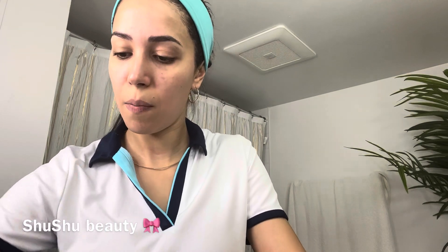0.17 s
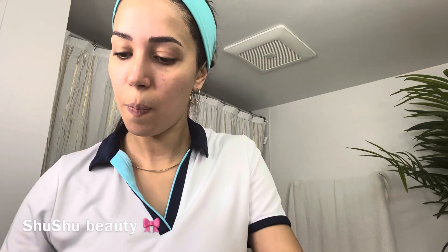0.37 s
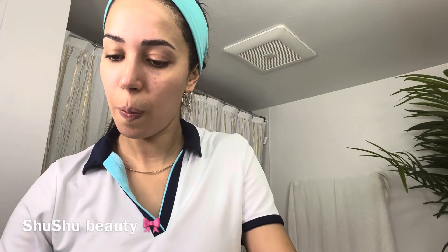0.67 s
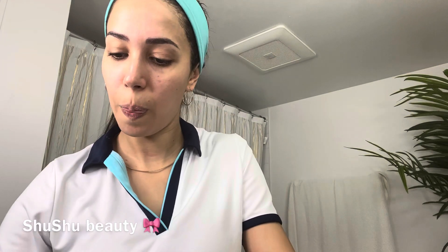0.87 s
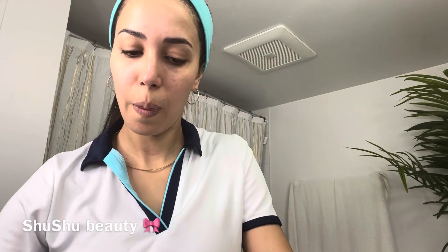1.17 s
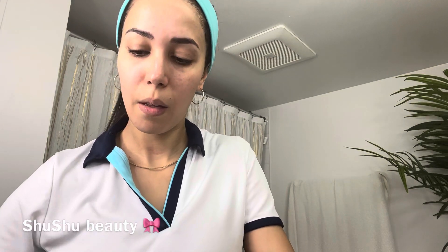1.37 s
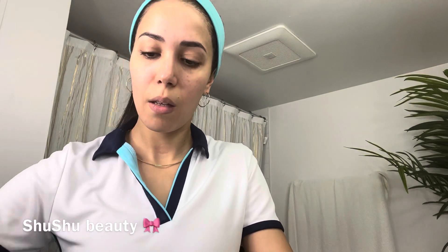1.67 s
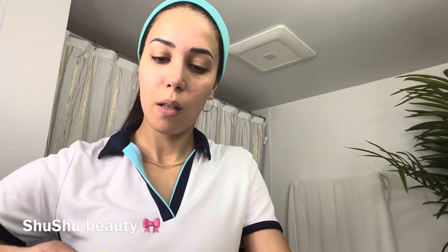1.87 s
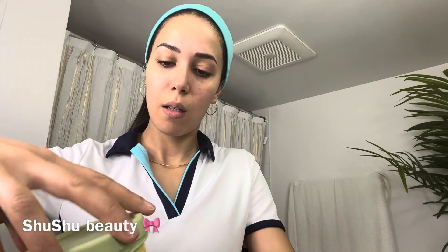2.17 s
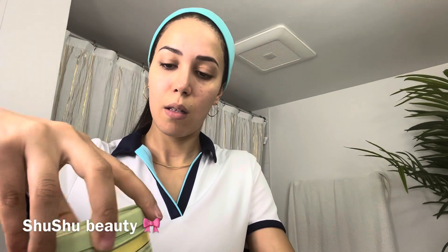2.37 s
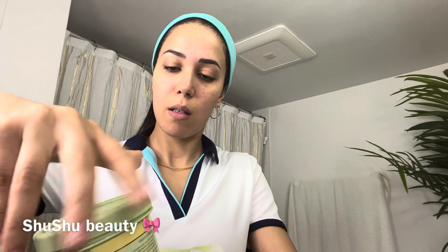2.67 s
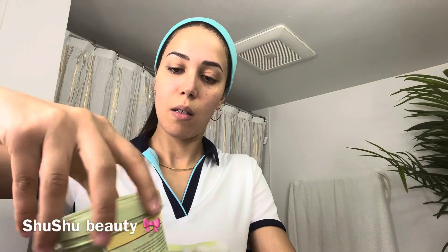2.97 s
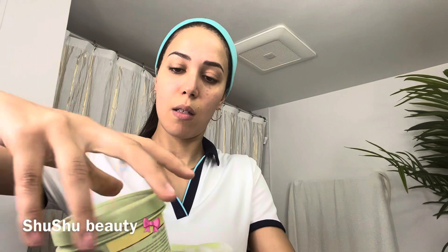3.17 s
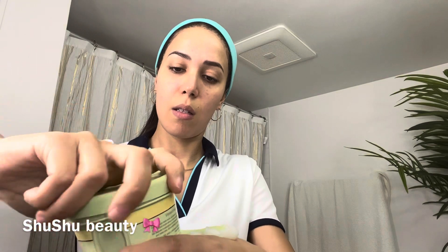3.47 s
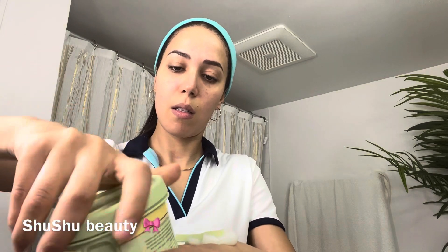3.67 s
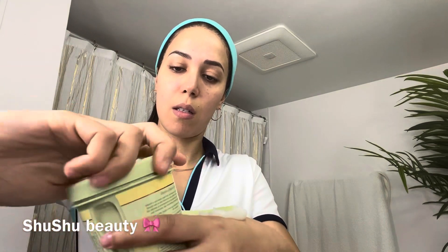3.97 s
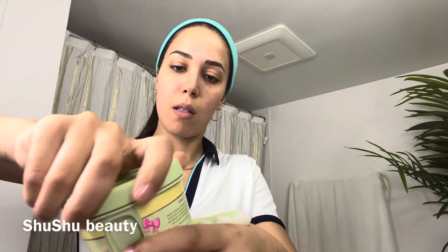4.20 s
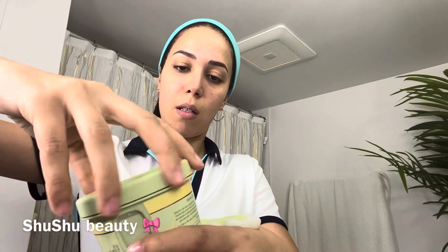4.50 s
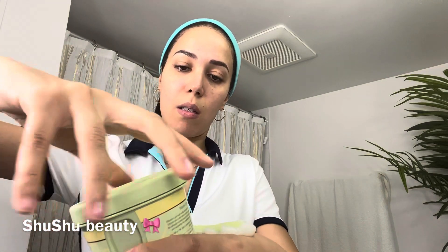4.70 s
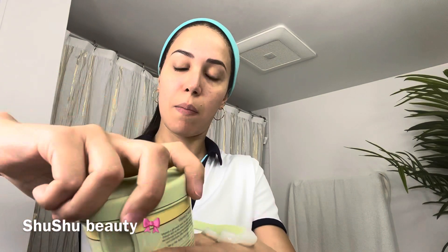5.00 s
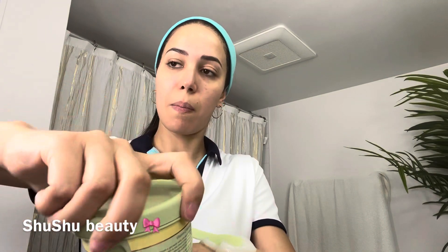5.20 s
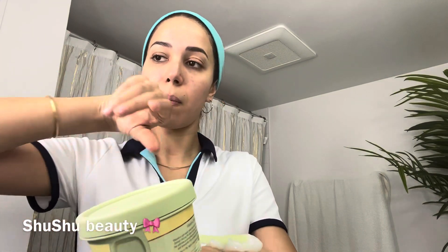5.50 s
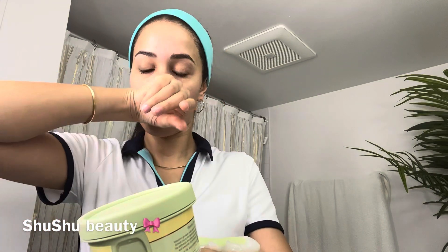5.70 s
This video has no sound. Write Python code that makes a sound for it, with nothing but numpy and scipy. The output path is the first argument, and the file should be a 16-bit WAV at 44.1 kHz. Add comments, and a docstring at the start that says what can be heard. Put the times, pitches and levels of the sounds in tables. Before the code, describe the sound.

A hollow plastic tub knocks and scrapes along a shelf, then its lid is twisted with squeaky rubs and one sharp snap close by.

```python
"""A plastic tub lurches along a shelf, then its lid is twisted shut stroke by stroke close by.
Stick-slip friction and short blows ring modes of the hollow body and stiff rim; the contact rasps and sings.
Fingers brush the plastic as band-shaped hiss, dry ticks are short noise through a resonance, and a small
thing pushed along the shelf scrapes through fixed modes. Low hum and thin hiss fill the room.
The two channels differ in phase and balance band by band, and in their short tails."""
import sys
import numpy as np
from scipy import signal
from scipy.fft import rfft, irfft
from scipy.io import wavfile
from scipy.ndimage import uniform_filter1d

SR = 44100
rng = np.random.default_rng(int(sys.argv[2]) if len(sys.argv) > 2 else 0)


def unload_wav(signal):
    """Save mono or channel-first audio to the path in sys.argv[1] as 16-bit WAV at rate SR, clipped to [-1, 1]."""
    wavfile.write(
        sys.argv[1],
        SR,
        np.round(np.clip(np.atleast_2d(signal).T, -1, 1) * 32767).astype(np.int16),
    )


N = 257844

# Phase lead of the left channel for sources in front. Each row: frequency in Hz, lead in radians.
LEAD_FRONT = [(330, 0), (520, 1.9), (690, 2.9), (860, 3.4), (1030, 5.8), (1400, 5.8), (1720, 6.7),
              (2240, 6.4), (2930, 7.4), (4800, 6.5), (6000, 8), (8700, 8.4), (9400, 9.4), (13500, 9.5),
              (14700, 10.5)]
# Channel balance for sources aside. Each row: frequency in Hz, left minus right in dB.
LEAN_ASIDE = [(60, 1.0), (110, 0.0), (200, -1.0), (380, -2.5), (700, -3.0), (1290, 2.5), (2380, 1.0),
              (4400, -0.5), (8120, 1.5), (15000, 0.0)]
GRIP_S = .03  # time scale on which sliding modes come and go


def amp(db):
    """Decibels to gain."""
    return 10 ** (np.asarray(db) / 20)


def evened(x):
    """Scales to rms 1."""
    return x / np.sqrt(np.mean(x ** 2) + 1e-20)


def read(points, hz):
    """Reads a table on a log-frequency axis."""
    f, value = np.transpose(points)
    return np.interp(np.log(hz + 1), np.log(f + 1), value)


def coloured(x, spectrum):
    """Gives a white signal a relative spectrum at the same power."""
    gain = amp(read(spectrum, np.fft.rfftfreq(N, 1 / SR)))
    return irfft(rfft(x) * evened(gain), N)


def ring(x, hz, width_hz):
    """One damped mode as a two-pole resonator, gain 1 at its centre."""
    r = np.exp(-np.pi * width_hz / SR)
    zeros = [(1 - r * r) / 2, 0, (r * r - 1) / 2]
    poles = [1, -2 * r * np.cos(2 * np.pi * hz / SR), r * r]
    return signal.lfilter(zeros, poles, x)


def glide(x, hz, width_hz):
    """A resonance that follows the curve hz: shift down, smooth, shift back."""
    turn = np.exp(2j * np.pi * np.cumsum(hz) / SR)
    r = np.exp(-np.pi * width_hz / SR)
    smoothed = signal.lfilter([1 - r], [1, -r], x / turn + 1e-18)
    return 2 * (turn * smoothed).real


def drift(db, span_s):
    """A factor that wanders at random, rms db, smoothed over span_s."""
    steps = rng.standard_normal(N // 64 + 2)  # one step per 64 samples
    steps = evened(uniform_filter1d(steps, max(round(span_s * SR / 64), 1)))
    return amp(db * np.interp(np.arange(N) / 64, np.arange(len(steps)), steps))


def grit(slips_per_s, spread_db, smooth):
    """Stick-slip friction: tiny slips of uneven size, with power share smooth of plain hiss."""
    judder_db, judder_s = 1.2, .012  # friction catches and lets go
    slips = rng.random(N) < slips_per_s / SR
    size = amp(spread_db * np.minimum(rng.exponential(1, N), 4))
    slips = slips * size * rng.choice([-1., 1.], N)
    judder = drift(judder_db, judder_s)
    mix = np.sqrt(1 - smooth) * evened(slips) + np.sqrt(smooth) * rng.standard_normal(N)
    return evened(judder * mix)


def pressed(strokes, ease_db):
    """Strokes rise, hold and fall, adding in power to one gain curve a layer; ease_db is the drop
    over one rise or fall. Further columns give curves steered by the loudest stroke of each layer."""
    steer = 3.5  # how firmly the loudest stroke sets a curve
    t = np.arange(0, N + 32, 32) / SR
    start, rise, hold, fall, *columns = np.transpose(strokes)[:, :, None]
    rise, fall = np.maximum(rise, 1e-3), np.maximum(fall, 1e-3)
    before = (start + rise - t) / rise
    after = (t - start - rise - hold) / fall
    slack = np.maximum(np.maximum(before, after), 0)
    layers_db = [db - drop * slack for db, drop in zip(columns, ease_db)]
    curves = [np.linalg.norm(amp(db), axis=0) for db in layers_db]
    for column, db in zip(columns[len(ease_db):], layers_db):
        weights = amp(steer * (db - db.max(axis=0)))
        curves.append(np.average(column + 0 * t, axis=0, weights=weights))
    return [np.interp(np.arange(N) / SR, t, curve) for curve in curves]


def struck(blows, db, push_s):
    """A short smooth push of the given level at each blow."""
    hits = np.zeros(N)
    hits[np.round(blows[:, 0] * SR).astype(int)] = amp(db)
    return signal.oaconvolve(hits, np.hanning(max(round(push_s * SR), 3)))[:N]


def plastic(strokes, ease_db, blows, upper_db, body, rim, friction, contact_db, contact_width_hz,
            focus_db, octave_db, ping_db, hollow_db, boom_db, damping):
    """Rubs and blows ring the hollow body and the stiff rim; the contact itself rasps and sings."""
    # Rasp spectrum. Each row: frequency in Hz, relative level in dB per Hz.
    rasp = [(600, -20.5), (1000, 4.5), (3000, 3), (3900, 1.5), (4800, -3.5), (6000, -3.5), (7800, -2),
            (9500, -1), (11200, -20), (13000, -8), (15700, -15)]
    wander_db, wander_s = .12, .03  # the singing pitches wander as the contact moves
    octave_hz, octave_width_hz = 2620, 140  # the octave sounds only where the wall answers
    hollow_width_hz = 40  # the wall that the grip leaves free sings at the body pitch
    body_focus_db = 4.5  # per octave away from the favoured body pitch
    deep_hz = 340  # modes below this move the whole body
    grip_db = 1.2  # the shifting hand damps each mode now more, now less

    rim_gain, body_gain, rasp_gain, contact_hz, body_hz = pressed(strokes, ease_db)
    contact_hz = contact_hz * drift(wander_db, wander_s)
    body_hz = body_hz * drift(wander_db, wander_s)
    blows = np.array(blows)
    s, knock_db, crack_db, deep_db = blows.T
    at = np.round((s + .004) * SR).astype(int)  # pitch is read just after the blow

    out = coloured(rasp_gain * friction[::-1], rasp)  # reversed: the rasp slips on its own

    # a blow sets the contact singing too
    ping = struck(blows, knock_db + ping_db, push_s=.0003) / (np.pi * contact_width_hz * .0003 / 3)

    def singing(hz):
        """Rubbed and struck resonance of the contact along the curve hz."""
        rubbed = evened(glide(friction, hz, contact_width_hz))
        return rim_gain * amp(contact_db) * rubbed + glide(ping, hz, contact_width_hz)

    out += singing(contact_hz)
    out += amp(octave_db) * ring(singing(2 * contact_hz), octave_hz, octave_width_hz)

    boom = struck(blows, knock_db + boom_db, push_s=0.00056) / (np.pi * hollow_width_hz * .001 / 2)
    out += body_gain * amp(hollow_db) * evened(glide(friction, body_hz, hollow_width_hz))
    out += glide(boom, body_hz, hollow_width_hz)

    for modes, gain, focus, free_hz in ((body, body_gain, body_focus_db, body_hz),
                                        (rim, rim_gain, focus_db, contact_hz)):
        hz, width_hz, db = np.transpose(modes)
        rub = gain * friction / np.sqrt(np.sum(amp(db) ** 2 * width_hz) * np.pi / SR)
        push_s = 0.89 / hz  # each mode answers the part of the blow lasting about its own period
        ring_size = amp(db) * width_hz * np.pi * push_s / 2  # what a unit push leaves in each mode
        deep = hz < deep_hz
        for k in range(len(hz)):
            off_db = focus * abs(np.log2(hz[k] / free_hz))  # modes near the favoured pitch are driven most
            if deep[k]:
                blow_db = deep_db
            else:
                blow_db = knock_db + (0 if modes is rim else upper_db) - 2 * off_db[at]
            peak = np.linalg.norm(ring_size[deep == deep[k]])
            sense = (-1) ** k  # neighbouring modes move in opposite sense
            knock = struck(blows, blow_db, push_s[k]) / peak / damping
            if modes is rim:
                knock = knock * sense
            slide = sense * rub * drift(grip_db, GRIP_S) * amp(-off_db)
            # a blow is damped more, so it dies away faster than the rubbing
            rung = ring(slide, hz[k], width_hz[k]) + ring(knock, hz[k], damping * width_hz[k])
            out += amp(db[k]) * rung

    # a burst of splinter noise at each contact
    crack = np.exp(-np.arange(600) / (0.00049 * SR))
    burst = signal.oaconvolve(struck(blows, crack_db, push_s=0), crack)[:N] * rng.standard_normal(N)
    return out + coloured(burst, rasp)


def dragged_tub():
    """Lurches along the shelf rub and knock the tub's modes."""
    # Lurches. Each row: start, rise, hold, fall in seconds, rim, body, rasp level in dB,
    # pitch of the rubbing contact in Hz, body pitch left free by the grip in Hz.
    drags = [(-.004, 0.0024, 0.002, 0.045, -44.5, -46.5, -54.5, 1105, 332),
             (.04, 0.037, 0.0027, 0.048, -72, -67.5, -80, 2200, 342),
             (.731, 0.002, 0.0021, 0.098, -45, -36, -47.5, 1786, 452),
             (.792, 0.0012, 0.0046, 0.057, -42.5, -41, -60, 1920, 462),
             (.82, 0.022, 0.083, 0.03, -52.5, -44, -67.5, 2040, 510),
             (.9, 0.001, 0.011, 0.1, -39, -39, -53.5, 1530, 528),
             (.99, 0.024, 0.0036, 0.037, -62, -38.5, -54, 1780, 465),
             (1.044, 0.0013, 0.011, 0.061, -83, -43, -89, 1350, 500),
             (1.11, 0.018, 0.017, 0.019, -76.5, -58, -99, 1381, 490)]
    # Each row: blow time in seconds, knock, crack, deep body level in dB.
    shelf_blows = [(0.046, -42, -50.5, -49.5), (0.734, -26, -42, -54), (0.7482, -23.5, -56, -51.5),
                   (0.795, -28.5, -57, -35.5), (0.8926, -50, -46, -55), (0.9035, -25.5, -53, -60),
                   (0.92, -36.5, -71, -42.5), (0.9599, -34, -84, -38), (0.986, -45.5, -65, -46),
                   (1.0029, -40, -36.5, -58), (1.049, -32.5, -62, -44.5), (1.592, -65.5, -81, -58),
                   (1.6795, -64, -89, -55), (1.894, -55.5, -63, -53)]
    # Modes of body and rim. Each row: frequency in Hz, width in Hz, level in dB.
    shelf_body = [(166, 46, -10), (268, 29.6, -6.5), (396, 62, -3.5), (448, 66, -6), (512, 42, -4.5),
                  (632, 42, -10), (693, 26, -7.5)]
    shelf_rim = [(866, 58, 9), (951, 67, -3), (1380, 340, -10), (1530, 20, -1.5), (1729, 14, 9.5),
                 (1780, 41, 4.5), (1900, 77, 2.5), (2120, 120, -6), (2080, 60, -10), (2300, 450, -12.5),
                 (2640, 174, 0.5), (3500, 250, -17)]
    return plastic(drags, (82, 14, 27.5), shelf_blows, -21.5, shelf_body, shelf_rim,
                   grit(2401, 8.4, 0.45), contact_db=-2.5, contact_width_hz=63, focus_db=11.0,
                   octave_db=5.0, ping_db=-21.0, hollow_db=-22, boom_db=-3.5, damping=1.16)


def pair(left, right, lead, lean):
    """The stereo processing turns the left channel in phase and leans the balance, band by band."""
    hz = np.fft.rfftfreq(N, 1 / SR)
    tip = amp(read(lean, hz) / 2)
    turned = rfft(left) * tip * np.exp(1j * read(lead, hz))
    return irfft(np.array([turned, rfft(right) / tip]), N)


def room_tone():
    """Low lumpy hum of the building and a thin hiss, partly shared by the channels."""
    # Noise spectra. Each row: frequency in Hz, relative level in dB per Hz.
    hum = [(13, -40.5), (22, -18.5), (47, 3), (69, 7), (111, -6), (130, -7.5), (193, -6), (247, -17.5),
           (304, -16), (500, -56.5), (650, -87.5), (1100, -120)]
    hiss = [(200, -50), (340, 10), (520, 5), (690, 0), (1030, -7), (1720, -10), (3000, -12), (4800, -16),
            (6000, -16), (8000, -14), (9500, -17), (12000, -22), (13500, -23), (15700, -34)]
    # Each row: frequency in Hz, likeness of the channels from 0 to 1.
    alike_room = [(60, .97), (300, .9), (700, .7), (1500, .3), (6000, .3), (8000, .7), (9500, .99),
                  (16000, .97)]
    hum_db, hiss_db = -57, -77
    white = rng.standard_normal((4, N))
    swell = amp(1.5 * evened(uniform_filter1d(rng.standard_normal(N), size=5000)))

    def tone(low, high):
        """Hum and hiss from two white noises."""
        return amp(hum_db) * swell * coloured(low, hum) + amp(hiss_db) * coloured(high, hiss)

    a, b = tone(white[0], white[2]), tone(white[1], white[3])
    same = read(alike_room, np.fft.rfftfreq(N, 1 / SR))
    left = irfft(same * rfft(a) + np.sqrt(1 - same ** 2) * rfft(b), N)
    return pair(left, a, LEAD_FRONT, LEAN_ASIDE)


def fingers():
    """Skin gliding over plastic hisses high; small dry ticks are decaying noise through one resonance, the one
    near 0.5 s from the small thing pushed along the shelf."""
    # Fingertip slides. Each row: start, rise, hold, fall in seconds, level in dB.
    brushes = [(.215, 0.0061, .08, 0.027, -79), (.25, 0.057, 0.0044, 0.045, -62.5),
               (.33, 0.048, 0.06, 0.04, -72.5), (1.83, 0.028, 0.0031, 0.029, -75),
               (2.77, 0.094, 0.04, 0.0053, -73), (3.27, 0.026, 0.0073, 0.13, -78),
               (3.62, 0.029, 0.013, 0.11, -60.5), (3.825, 0.02, 0.0057, 0.07, -65.5),
               (3.897, 0.0032, .003, 0.12, -68.5), (4.79, 0.02, .01, 0.061, -81),
               (4.82, 0.091, 0.0084, 0.1, -67), (5.18, 0.051, 0.047, 0.054, -59.5)]
    # Skin spectrum. Each row: frequency in Hz, relative level in dB per Hz.
    skin = [(1500, -25.5), (2900, -14), (3800, -9), (4800, -10), (6000, -3.5), (8000, 0.5), (9500, 6),
            (11200, -15.5), (13000, -3.5), (15700, 1.5)]
    # Each row: tick time in seconds, level in dB, pitch in Hz, width as share of pitch. The last row is a tick
    # of the small thing pushed along the shelf.
    ticks = [(1.3268, -42.5, 8800, 0.11), (1.3859, -40.5, 6500, 0.16), (1.781, -41, 2090, 0.22),
             (3.904, -42, 6000, 1), (4.476, -49, 7500, 0.23), (0.503, -26, 1200, 0.23)]
    gain = pressed(brushes, (22,))[0]
    out = coloured(gain * grit(6600, 0.63, 0.38), skin)
    t = np.arange(900) / SR
    shape = np.exp(-t / 0.00031) + 0.046 * np.exp(-t / 0.0019)
    for s, db, hz, share in ticks:
        at = round(s * SR)
        noise = rng.standard_normal(len(t))
        out[at:at + len(t)] += amp(db) * ring(noise * shape, hz, share * hz)
    return out


def nudges():
    """Something small pushed along the shelf: a fine scrape through a few fixed modes."""
    # Each row: start, rise, hold, fall in seconds, level in dB, low modes in dB.
    pushes = [(.217, 0.0017, 0.066, 0.021, -67.5, -32), (.454, 0.0034, 0.038, 0.012, -55, -5),
              (.498, .003, 0.03, 0.012, -63, 0.5), (.62, 0.011, 0.011, 0.024, -79, -3)]
    # Modes. Each row: frequency in Hz, width in Hz, level in dB.
    nudged = [(920, 85, 0), (1128, 31, 0.5), (1250, 45, -7), (1660, 260, -7.5), (1830, 104, -3.5),
              (2040, 125, -5.5), (2880, 400, -7), (3130, 150, -5.5), (4120, 360, -22), (6700, 11000, -27.5)]
    shift_db = 3  # its modes come and go as it slides
    low_hz = 2500  # modes under this follow the low-mode level; a light push leaves them quiet
    gain, low_db = pressed(pushes, (6,))
    friction = grit(5500, 9.0, 1.0)
    full, out = 0, 0
    for k, (hz, width_hz, db) in enumerate(nudged):
        mode = (-1) ** k * amp(db) * ring(friction * drift(shift_db, GRIP_S), hz, width_hz)
        full = full + mode
        out = out + mode * (amp(low_db) if hz < low_hz else 1)
    return gain * out / np.std(full)


def twisted_lid():
    """Thread rubs on thread and rings the hollow jar; the lid snaps over a ridge."""
    # Strokes. Each row: start, rise, hold, fall in seconds, rim, body, rasp level in dB,
    # pitch of the rubbing contact in Hz, body pitch left free by the grip in Hz.
    twists = [(2.197, 0.0074, 0.013, 0.021, -67, -54.5, -99, 1220, 510),
              (2.225, 0.0069, 0.0048, 0.048, -59, -54, -87, 1360, 500),
              (2.29, 0.016, 0.013, 0.027, -59, -47, -76, 1320, 610),
              (2.35, 0.045, 0.024, 0.026, -53, -43.5, -60.5, 1465, 555),
              (2.43, 0.07, 0.03, 0.026, -42.5, -33.5, -43.5, 1325, 570),
              (2.548, 0.0055, 0.0038, 0.067, -54, -38, -46.5, 1900, 323),
              (2.88, 0.011, 0.032, 0.067, -58.5, -50, -62, 1590, 540),
              (2.91, 0.061, 0.053, 0.052, -55, -45.5, -56, 1400, 437),
              (3.248, 0.0026, 0.0044, 0.032, -70, -65.5, -94, 1335, 386),
              (3.27, 0.023, 0.026, 0.049, -78, -86, -85.5, 2080, 403),
              (3.33, 0.0099, 0.012, 0.031, -73.5, -60.5, -85, 1660, 600),
              (3.37, 0.086, 0.012, 0.036, -51.5, -46.5, -58, 1390, 613),
              (3.41, 0.072, 0.031, 0.033, -46, -45.5, -62, 2450, 636),
              (3.49, 0.03, 0.016, 0.092, -46, -54.5, -54, 2065, 520),
              (3.5, 0.067, 0.058, 0.044, -52.5, -51.5, -62, 2096, 580),
              (3.986, 0.0042, 0.0081, 0.039, -34.5, -39, -46, 1350, 650),
              (3.99, 0.0043, 0.08, 0.038, -53, -36, -58, 2200, 291),
              (4.0, 0.0047, 0.14, 0.1, -45, -47.5, -59, 2203, 520),
              (4.1, 0.064, 0.032, 0.086, -42, -46, -52.5, 2160, 676),
              (4.19, 0.042, 0.037, 0.026, -48.5, -50.5, -57, 2440, 680),
              (4.25, 0.017, 0.019, 0.035, -60.5, -61.5, -67, 2860, 500),
              (4.31, 0.018, 0.017, 0.12, -90, -66.5, -100, 2120, 502),
              (4.455, 0.0054, 0.02, 0.043, -56.5, -44.5, -65.5, 1293, 520),
              (4.475, 0.033, 0.02, 0.027, -54.5, -44.5, -58.5, 1850, 520),
              (4.515, 0.014, 0.022, 0.021, -58, -46, -64.5, 3060, 540),
              (4.545, 0.017, 0.029, 0.049, -71.5, -47.5, -57.5, 2500, 538),
              (4.736, 0.0032, 0.0088, 0.071, -99.5, -55.5, -100, 1716, 299.4),
              (4.79, 0.02, 0.0076, 0.086, -76, -69.5, -80, 2317, 302)]
    # Each row: blow time in seconds, knock, crack, deep body level in dB.
    lid_blows = [(2.2063, -64, -90, -63), (2.2368, -54, -88, -48), (2.305, -52, -72, -58.5),
                 (2.379, -48, -68, -62), (2.4, -53, -64, -58), (2.4877, -32, -44, -57),
                 (2.527, -42, -58, -42), (2.574, -52, -62, -44), (2.8900, -50, -54, -59),
                 (2.9757, -48, -60, -52), (3.2038, -80, -85, -57.5), (3.241, -80, -95, -52),
                 (3.2545, -60, -75, -47), (3.3458, -59, -89, -64), (3.62, -50, -62, -62),
                 (3.637, -54, -64, -66), (3.9847, -22, -26, -30), (3.9856, -13, -19, -21),
                 (4.3256, -55, -80, -69), (4.4558, -30, -56, -35), (4.516, -52, -66, -46),
                 (4.585, -50, -64, -52), (4.7414, -62, -94, -43), (4.768, -75, -95, -50)]
    # Modes of body and rim. Each row: frequency in Hz, width in Hz, level in dB.
    jar_body = [(170, 14, -16.5), (205, 27, -20.5), (291, 16, 1), (395.8, 51, -22.5), (520, 24.4, 0),
                (619, 57, -1.5), (651, 36, -1), (727, 36, -3), (890, 91, -18)]
    jar_rim = [(974, 13, 0), (1005, 100, -14), (1246, 45, 0.5), (1361, 110, -1), (1530, 77, -6),
               (1770, 260, -2), (2010, 80, -1.5), (2120, 72.3, -2.5), (2315, 230, -9), (2477, 200, -4),
               (2640, 130, -2), (2640, 160, -13.5), (3150, 150, -20.5), (4150, 410, -16.5)]
    return plastic(twists, (24, 17, 29.5), lid_blows, 2, jar_body, jar_rim,
                   grit(3001, 2.2, 0.68), contact_db=-5, contact_width_hz=79, focus_db=9.5,
                   octave_db=-22, ping_db=-14.5, hollow_db=-22, boom_db=-20.0, damping=1.3)


def placed(x, lead, lean, wet_db):
    """Direct sound plus short tails that differ by channel and fade in and out in rotation, steadily."""
    # Each row: frequency in Hz, decay time by 60 dB in seconds.
    decay = [(200, 0.11), (700, 0.12), (2000, 0.056), (6000, 0.085), (9000, 0.0062)]
    # Each row: frequency in Hz, likeness of the tail in the channels from 0 to 1.
    alike_tail = [(60, 1), (200, 0.16), (500, 0.033), (1500, 0.0088)]
    shift_s = .05  # the echo pattern changes this fast
    turn, wet = np.arange(N) / SR / shift_s, 0
    for k in range(3):
        # one echo of random sign in every 20 samples
        taps = np.zeros((2, SR // 5))
        at = np.arange(100, SR // 5 - 20, 20) + rng.integers(0, 20, (2, (SR // 5 - 101) // 20))
        np.put_along_axis(taps, at, rng.choice([-1., 1.], at.shape), 1)
        hz, t, z = signal.stft(taps, SR, nperseg=256)
        same = read(alike_tail, hz)[:, None]
        z = np.array([same * z[1] + np.sqrt(1 - same ** 2) * z[0], z[1]])
        fade = amp(-60 * t / read(decay, hz)[:, None])
        tail = signal.istft(z * fade, SR, nperseg=256)[1]
        tail = tail / np.linalg.norm(tail[0])
        share = np.sqrt(2 / 3) * np.cos(np.pi * (turn + k / 3))
        wet = wet + signal.oaconvolve((share * x)[None], tail, axes=1)[:, :N]
    left, right = x + amp(wet_db) * wet
    return pair(left, right, lead, lean)


def scene():
    """The jar and fingers in front, the shelf to one side, the room around."""
    # Each row: frequency in Hz, left channel lead in radians.
    lead_aside = [(220, 0), (345, .9), (690, 2.2), (1030, 2.5), (1380, 1.3), (2240, 2.1), (2930, 3.1),
                  (4800, 3), (6000, 1.5), (8700, 2.0), (9400, 3.1), (13500, 3.2), (14700, 4.4)]
    # Each row: frequency in Hz, left minus right in dB.
    lean_front = [(60, 1.0), (110, -0.5), (200, -2.5), (380, -4.5), (700, -3.5), (1290, -0.5), (2380, 0.5),
                  (4400, -1.5), (8120, 1.0), (15000, 0.0)]
    jar = twisted_lid()
    shelf = dragged_tub()
    front = placed(jar + fingers(), LEAD_FRONT, lean_front, wet_db=-8.5)
    aside = placed(shelf + nudges(), lead_aside, LEAN_ASIDE, wet_db=-3.0)
    return front + aside + room_tone()


def record(dry):
    """Band limit: a steep linear-phase low-pass."""
    edge_hz = 15750
    lowpass = signal.firwin(511, edge_hz, window=("kaiser", 9), fs=SR)
    return signal.oaconvolve(dry, lowpass[None], "same")


dry = scene()
out = record(dry)
unload_wav(out)
```